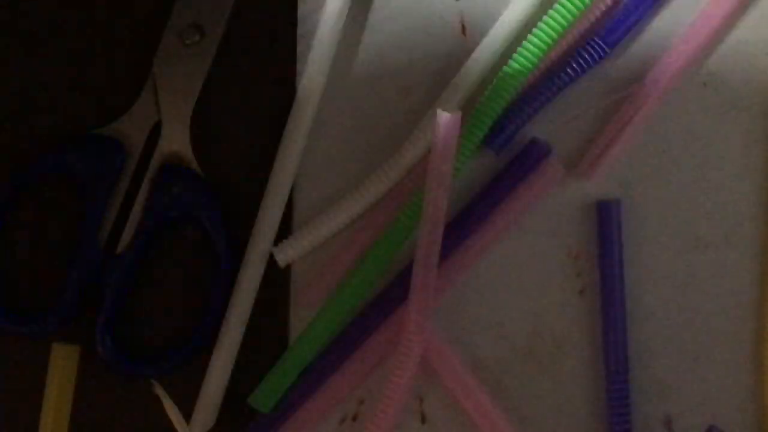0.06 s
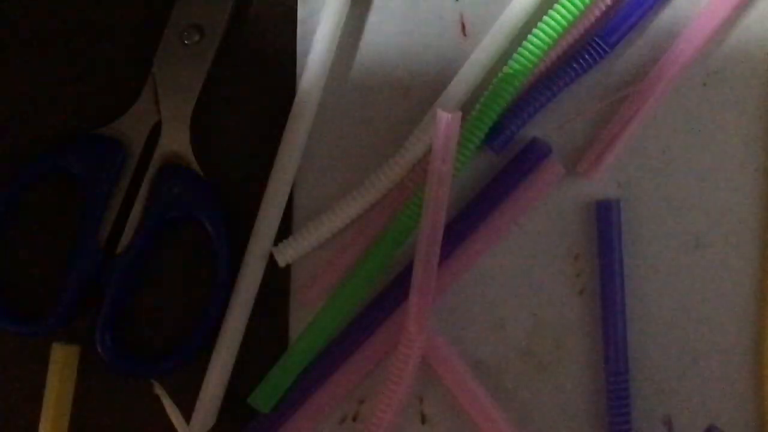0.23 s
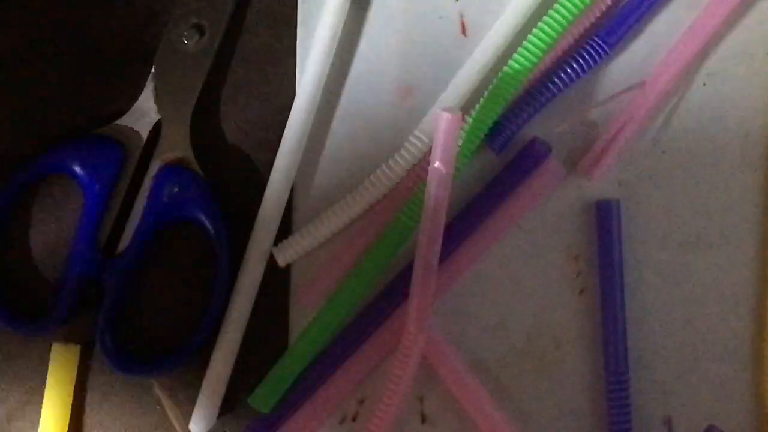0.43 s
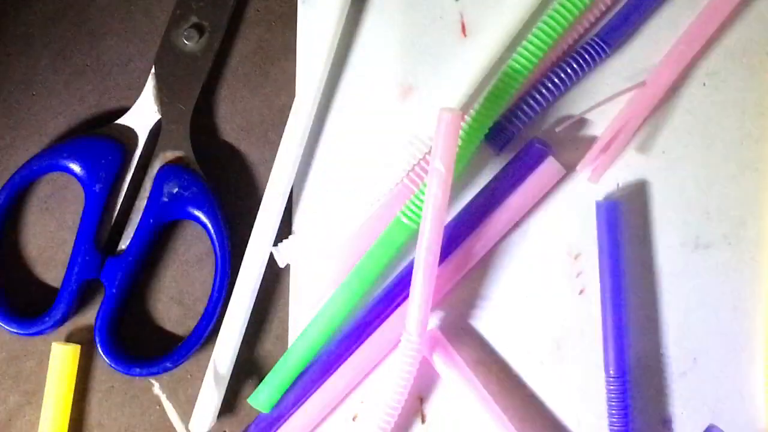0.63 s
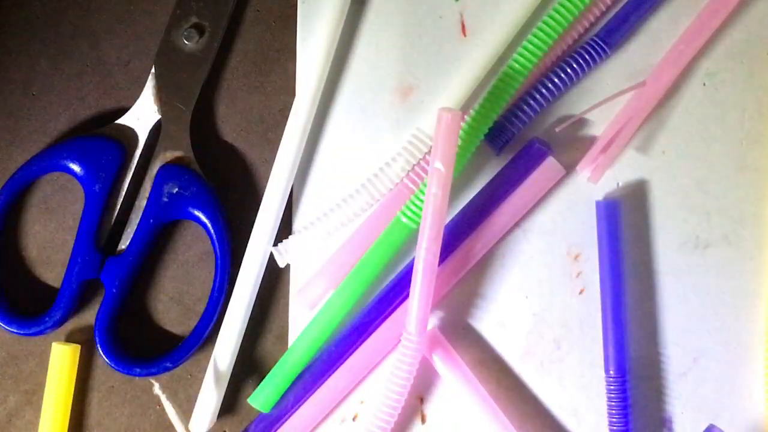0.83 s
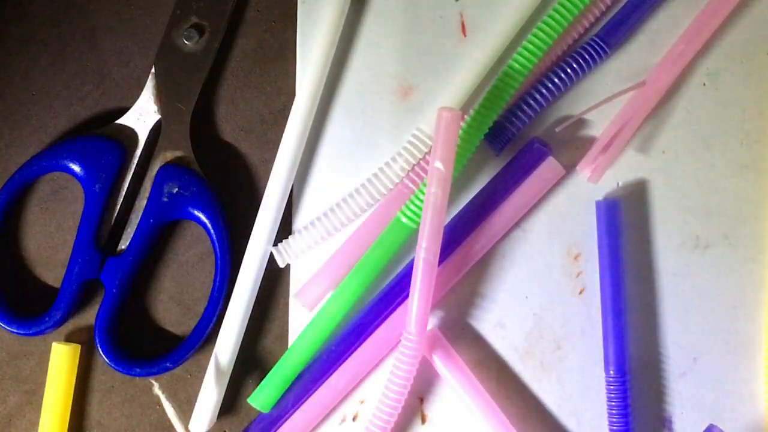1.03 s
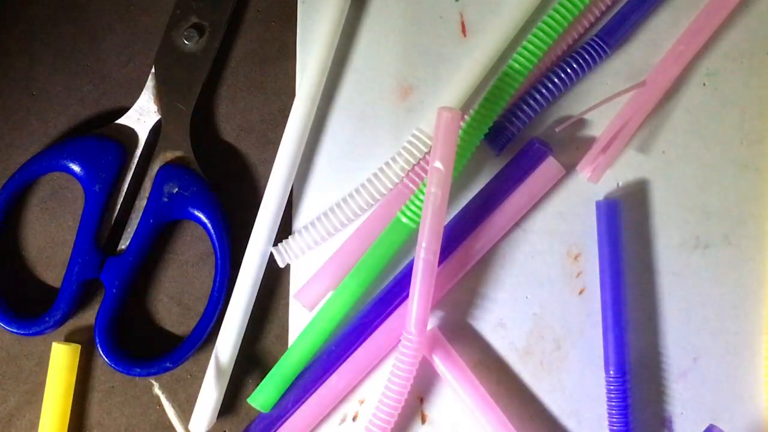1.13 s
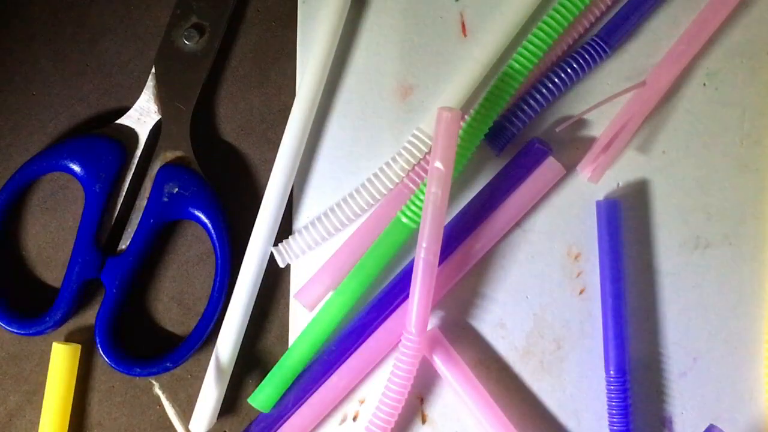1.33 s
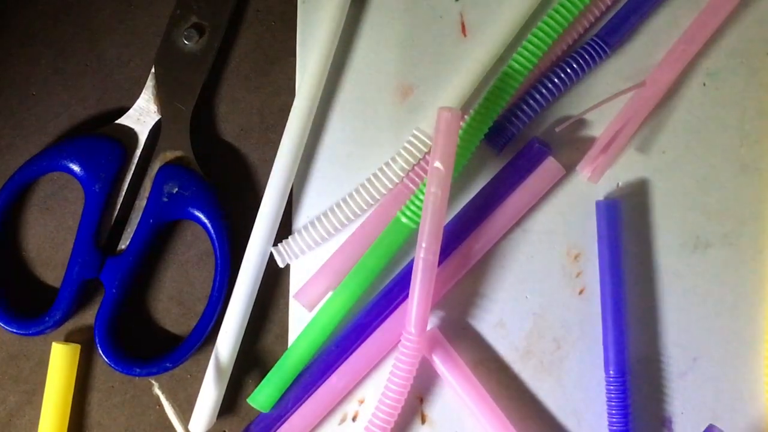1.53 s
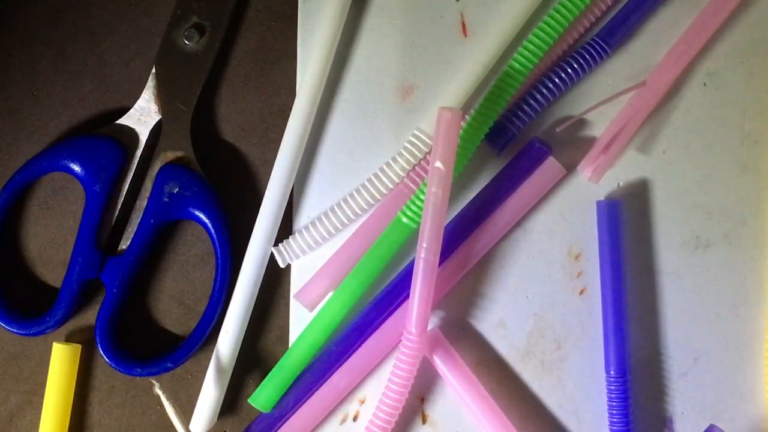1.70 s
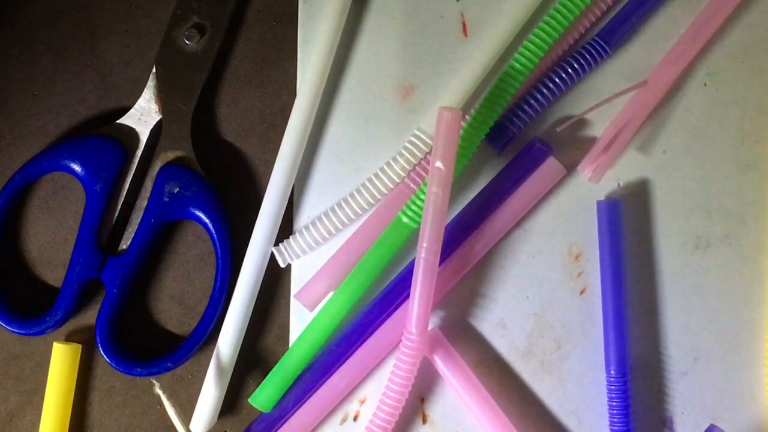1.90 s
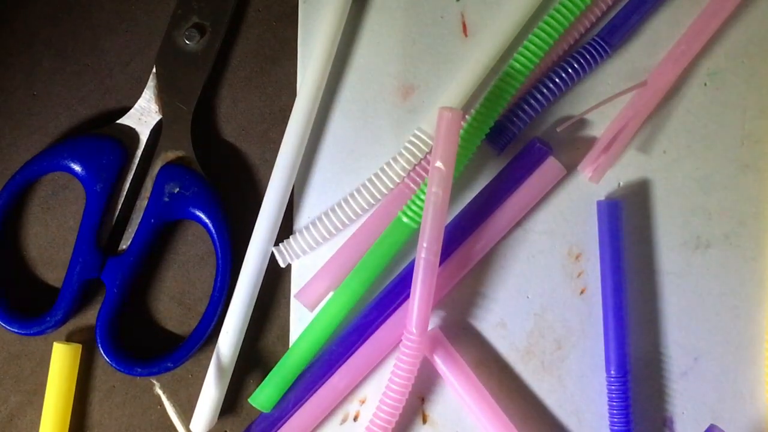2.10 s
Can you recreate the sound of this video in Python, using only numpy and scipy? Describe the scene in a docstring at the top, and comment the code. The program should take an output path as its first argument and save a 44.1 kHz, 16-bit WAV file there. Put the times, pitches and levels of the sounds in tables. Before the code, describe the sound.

A desk lamp switch snaps on with a sharp, close click at about 0.25 seconds, after a few tiny finger ticks. The lamp's metal parts rattle and tick until 0.5 seconds, and a faint thin hiss fades by 0.8. A sleeve rustles very faintly, then a soft, dull knock lands on the table near 1.5 seconds. A low appliance hum runs throughout in the small room.

```python
"""A table in a small room, where a desk lamp is switched on. Fingers rub and tick on the switch; its lever
creaks, then snaps and rings the housing. The jolt shakes the table and rattles the lamp's metal parts,
and a thin hiss swells and stops as the light comes up. A sleeve rustles, a hand shifts and something
knocks softly on the table. A fan or appliance hums throughout."""
import sys
import numpy as np
from scipy import signal
from scipy.fft import rfft, irfft
from scipy.io import wavfile

SR = 44100
rng = np.random.default_rng(int(sys.argv[2]) if len(sys.argv) > 2 else 0)


def to_wav(s):
    """Save 16-bit WAV."""
    ch = np.atleast_2d(s).T  # columns
    pcm = np.round(np.clip(ch, -1, 1) * 32767)  # PCM
    wavfile.write(sys.argv[1], SR, pcm.astype(np.int16))


N = 94815
T = np.arange(N) / SR


def from_db(db):
    """Decibels to gain."""
    return 10 ** (np.asarray(db) / 20)


def noise(colour):
    """Noise shaped to an (f/Hz, level/dB) curve, rms 1."""
    hz, db = np.transpose(colour)
    bins_hz = np.maximum(np.arange(N // 2 + 1) * SR / N, 1)
    eq = from_db(np.interp(np.log(bins_hz), np.log(hz), db))
    shaped = irfft(rfft(rng.standard_normal(N)) * eq, N)
    return shaped / shaped.std()


def drift(rate_hz):
    """Slow random wander, spread about 1."""
    knots = rng.standard_normal(256)
    return np.interp(T * rate_hz, np.arange(len(knots)), knots)


def fader(curve):
    """Gain that rides a (t/s, level/dB) curve."""
    return from_db(np.interp(T, *np.transpose(curve)))


def decay(start, t60):
    """Envelope that jumps to 1 and falls 60 dB in t60 seconds."""
    return (T >= start) * np.exp(-np.log(1000) * np.clip((T - start) / t60, 0, 10))


def strike(hits, modes, spread_db=0):
    """Each hit rings every mode as a damped sine; neighbouring modes swing opposite ways."""
    out = np.zeros(N)
    for s, db in hits:
        start = int(s * SR)
        t = T[:min(N - start, SR // 2)]
        for k, (hz, mode_db, t60) in enumerate(modes):
            gain = (-1) ** k * from_db(db + mode_db + spread_db * rng.standard_normal())
            ring = np.sin(2 * np.pi * hz * t) * np.exp(-np.log(1000) * t / t60)
            out[start:start + len(t)] += gain * ring
    return out


def bursts(hits, colour, t60):
    """A decaying burst of contact noise for each (t/s, level/dB) hit; overlaps add in power."""
    power = sum((from_db(db) * decay(s, t60)) ** 2 for s, db in hits)
    return noise(colour) * np.sqrt(power)


# partials of the hum: f/Hz, rms level/dB
HUM_PARTIALS = [(67, -75.5), (98, -73), (146, -84), (195, -81), (243.9, -61.5), (342, -77), (441, -83.5),
                (537.5, -77.5), (585.8, -74), (698, -88.5), (1416, -86), (3418, -88), (4490, -94)]
# colour of the room tone: f/Hz, level/dB
AIR_COLOUR = [(22, -51), (33, -5), (45, 3), (95, 0), (140, -10.5), (300, -15), (450, -19), (620, -10.5),
              (800, -19), (1050, -23), (1500, -20), (2300, -27.5), (3700, -31), (4600, -33.5),
              (5100, -35.5), (10000, -37), (15500, -40.5)]
HUM_WAVER_RAD, HUM_FLUTTER_DB, AIR_DB = 0.23, 1.2, -63.5
def appliance_hum():
    """A fan or appliance hums, wavering slightly, over a bed of rumble and soft air."""
    hum = np.zeros(N)
    for hz, db in HUM_PARTIALS:
        gain = np.sqrt(2) * from_db(db + HUM_FLUTTER_DB * drift(6.2))
        phase = 2 * np.pi * (hz * T + rng.random()) + HUM_WAVER_RAD * drift(2)
        hum += gain * np.sin(phase)
    return hum + from_db(AIR_DB) * noise(AIR_COLOUR)


# envelope of the rubbing: t/s, level/dB
RUB_ENVELOPE = [(0, -77), (.08, -75), (.12, -70.5), (.15, -76), (.2, -66.5), (.24, -85)]
# colour of a touch on the switch, for rub and ticks alike: f/Hz, level/dB
TOUCH_COLOUR = [(300, -18), (1500, 6.5), (4000, 4), (6500, 0.5), (10000, 1), (15500, -2)]
def finger_rub():
    """Fingers slide on the switch with a faint, bright friction noise."""
    return fader(RUB_ENVELOPE) * noise(TOUCH_COLOUR)


# light taps of fingers and lever: t/s, level/dB, low-pass f/Hz
TICK_CUES = [(.053, -62, 8000), (0.091, -50.5, 11400), (.113, -61, 13000), (0.122, -60, 12000),
             (0.129, -60.5, 14000), (.176, -62, 15000), (.2095, -58, 16000), (0.2141, -41, 7000),
             (0.22, -54, 14000), (0.231, -48, 17000), (0.3288, -45.5, 16100), (0.346, -56, 17000),
             (0.4316, -44.5, 16000), (0.683, -52.5, 5000), (1.4313, -65, 15900), (1.475, -65, 12100)]
def ticks():
    """Tiny dry contacts, each as bright as it is hard."""
    touch = noise(TOUCH_COLOUR)
    out = np.zeros(N)
    for s, db, hz in TICK_CUES:
        lowpass = signal.butter(2, hz, fs=SR, output="sos")
        out += signal.sosfilt(lowpass, touch * from_db(db) * decay(s, t60=0.033))
    return out


# slips of the lever: t/s, level/dB
CREAK_CUES = [(.177, -57), (.184, -61.5), (.2098, -41.5), (.231, -44.5), (.3025, -42.5)]
# modes of the creak: f/Hz, level/dB, t60/s
CREAK_MODES = [(3553, 4.5, .018), (3970, -12, .015)]
def lever_creak():
    """The lever moves in short slips, each a tight, high ping."""
    return strike(CREAK_CUES, CREAK_MODES)


# swell of the hiss: t/s, level/dB
HISS_ENVELOPE = [(.2, -94), (.27, -63), (.42, -65.5), (.5, -57.5), (.58, -67.5), (.69, -66), (.77, -70.5),
                 (.84, -86)]
# colour of the hiss: f/Hz, level/dB
HISS_COLOUR = [(700, -17.5), (2000, -4), (4500, 1.5), (5100, -5), (6500, -2.5), (8000, -1), (10000, 2.5),
               (12500, -1), (15500, -6)]
def lamp_hiss():
    """A thin hiss swells and falls away as the light comes up."""
    return fader(HISS_ENVELOPE) * noise(HISS_COLOUR)


# snaps of the switch: t/s, housing level/dB, crack level/dB, pitch ratio
SNAP_CUES = [(0.2161, -13.5, -68, 0.96), (.2426, -1, -30.5, 0.98), (0.2614, -18.5, -36.5, 1.0),
             (.4006, -22, -49, .8)]
# modes of the switch housing: f/Hz, level/dB, t60/s
HOUSING_MODES = [(704, -32, 0.086), (1520, -34.5, 0.029), (1915, -20, 0.024), (2467, -17, 0.021),
                 (2818, -35.5, 0.066), (3620, -34, 0.057), (4360, -32, 0.015), (6500, -49, .03),
                 (7210, -45, 0.0202), (8670, -45, 0.028)]
# colour of the sharp attack: f/Hz, level/dB
CRACK_COLOUR = [(200, -36), (600, -1), (1100, 3), (2500, -1), (5000, -3.5), (7800, -1.5), (10000, -10),
                (15500, -10)]
TABLE_ECHO_S, TABLE_ECHO_DB = .0024, -13
def switch_snap():
    """Each snap cracks and rings the housing; the ring bounces off the table top."""
    ring = sum(strike([(s, db)], np.array(HOUSING_MODES) * [pitch, 1, 1])
               for s, db, _, pitch in SNAP_CUES)
    echo = from_db(TABLE_ECHO_DB) * np.interp(T - TABLE_ECHO_S, T, ring)
    crack_hits = [(s, db) for s, _, db, _ in SNAP_CUES]
    return ring + echo + bursts(crack_hits, CRACK_COLOUR, t60=0.037)


# jolts from the lamp: t/s, level/dB
JOLT_CUES = [(.2165, -0.5), (.243, -4), (.266, -1), (.37, -18.5), (.435, -11.5), (.682, -18)]
# modes of the table: f/Hz, level/dB, t60/s
TABLE_MODES = [(327, -55, 0.11), (441, -57.5, 0.077), (600, -45.5, 0.068), (715, -43.5, .13),
               (813, -45.5, 0.095), (876, -43, 0.07), (1238, -49.5, 0.099)]
def table_jolts():
    """The lamp jolts the table, whose ring puts body under the clicks."""
    return strike(JOLT_CUES, TABLE_MODES, spread_db=3)


# metal-on-metal contacts: t/s, ring level/dB, scrape level/dB, roll-off f/Hz
RATTLE_CUES = [(0.2307, -4, -45, 2995), (0.2397, -13, -45, 3500), (0.2462, 1, -38, 5000),
               (0.2608, -4.5, -42, 5000), (0.28, -11, -42, 8000), (0.316, -23, -58, 8000),
               (.329, 0, -41.5, 7000), (0.3786, -5, -51, 2600), (.387, -17, -47, 7000),
               (0.4007, -10.5, -49.5, 7000), (0.407, -15, -52, 7000), (.418, -10.5, -51, 2200),
               (.443, -19, -57, 4000), (0.482, -13, -68, 1800)]
# modes of the metal parts: f/Hz, level/dB, t60/s
METAL_MODES = [(1461.5, -41.5, 0.086), (1817, -53, 0.178), (1936, -50, .18), (2197, -65.5, 0.11),
               (2439, -56, 0.15), (2720, -55, 0.16), (2883, -49.5, 0.15), (2970, -52.5, 0.062),
               (3390, -48.5, .05), (3760, -59, .09), (4574, -44, 0.095), (5560, -59.5, 0.0835)]
# colour of the scrape: f/Hz, level/dB
SCRAPE_COLOUR = [(300, -16.5), (1100, -10), (1600, 0), (2400, -3), (3500, 2), (4600, 1.5), (5100, -14.5),
                 (5700, -4), (6500, -14), (8000, -23), (15000, -40)]
def lamp_rattle():
    """The shaken lamp's parts scrape and ring; softer contacts ring the high modes less."""
    ring = np.zeros(N)
    for s, db, _, rolloff_hz in RATTLE_CUES:
        modes = [(hz, mode_db - 10 * np.log10(1 + (hz / rolloff_hz) ** 4), t60)
                 for hz, mode_db, t60 in METAL_MODES]
        ring += strike([(s, db)], modes, spread_db=1.5)
    scrape_hits = [(s, db) for s, _, db, _ in RATTLE_CUES]
    return ring + bursts(scrape_hits, SCRAPE_COLOUR, t60=0.04)


# movement of the sleeve: t/s, level/dB
RUSTLE_ENVELOPE = [(.4, -89), (.53, -66), (.8, -82.5), (1.0, -78), (1.17, -71), (1.3, -73), (1.45, -77),
                   (1.55, -80)]
# colour of the cloth: f/Hz, level/dB
RUSTLE_COLOUR = [(300, -6.5), (800, 1.5), (1600, -1), (2800, 0), (3700, -0.5), (5200, -10), (10000, -14),
                 (15000, -20)]
def sleeve_rustle():
    """A sleeve brushes along in two faint swells."""
    return fader(RUSTLE_ENVELOPE) * noise(RUSTLE_COLOUR)


# movement of the hand: t/s, level/dB
SHIFT_CUES = [(1.385, -59.5)]
# its dark colour: f/Hz, level/dB
SHIFT_COLOUR = [(120, -3), (380, -2), (800, -11), (2000, -28), (6000, -40)]
def hand_shift():
    """The hand shifts with a muffled scuff just before the knock."""
    return bursts(SHIFT_CUES, SHIFT_COLOUR, t60=0.46)


# knock on the table: t/s, level/dB
KNOCK_CUES = [(1.477, -6)]
# modes of the knock, ahead of its band-pass: f/Hz, level/dB, t60/s
KNOCK_MODES = [(189, -46, 0.12), (802, -24, 0.04), (923, -20.5, .014), (1490, -36, 0.028),
               (1770, -36.5, 0.023), (2030, -33.5, 0.029), (2370, -43, 0.028), (2790, -46.5, 0.027),
               (3020, -52, 0.019), (3770, -49, .015)]
KNOCK_BAND_HZ = [197, 2700]
def knock():
    """A soft blow on the table rings dull and hollow, with a slight thump under it."""
    bandpass = signal.butter(2, KNOCK_BAND_HZ, "band", fs=SR, output="sos")
    return signal.sosfilt(bandpass, strike(KNOCK_CUES, KNOCK_MODES))


# colour of the reverb: f/Hz, level/dB
REVERB_COLOUR = [(150, -6), (700, 0.5), (1500, 3.5), (2400, -4), (4000, 1), (8000, -1.5), (15000, 1)]
PREDELAY_S, REVERB_T60_S = 0.0025, 0.32
def room_reverb(send):
    """Diffuse reflections of a small furnished room."""
    response = noise(REVERB_COLOUR) * decay(PREDELAY_S, REVERB_T60_S)
    response /= np.sqrt(np.sum(response ** 2))
    return signal.fftconvolve(send, response)[:N]


NOTCH_HZ, NOTCH_Q = 7720, 11.3
CLICK_SEND_DB, KNOCK_SEND_DB = -8, -24
def scene():
    """Mono mix: the clicks get a narrow treble notch and share the reverb with the knock."""
    clicks = finger_rub() + ticks() + lever_creak() + switch_snap() + table_jolts() + lamp_rattle()
    clicks = signal.lfilter(*signal.iirnotch(NOTCH_HZ, NOTCH_Q, SR), clicks)
    bump = knock()
    reverb = room_reverb(from_db(CLICK_SEND_DB) * clicks + from_db(KNOCK_SEND_DB) * bump)
    bed = appliance_hum() + lamp_hiss() + sleeve_rustle() + hand_shift()
    return (clicks + bump + reverb + bed)[None]


HIGH_CUT_HZ = 15900
def record(dry):
    """A steep high cut on the whole mix."""
    return signal.sosfilt(signal.ellip(10, .1, 70, HIGH_CUT_HZ, fs=SR, output="sos"), dry)


dry = scene()
out = record(dry)
to_wav(out)
```